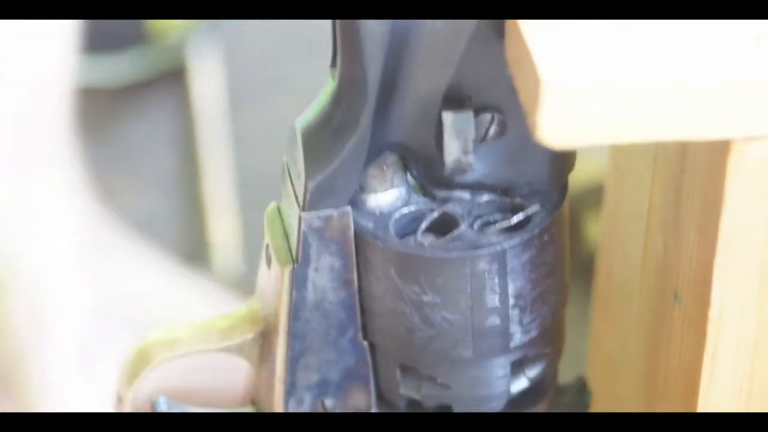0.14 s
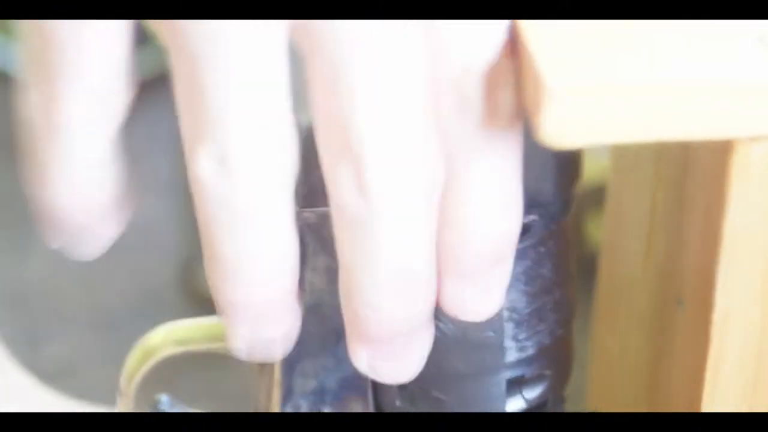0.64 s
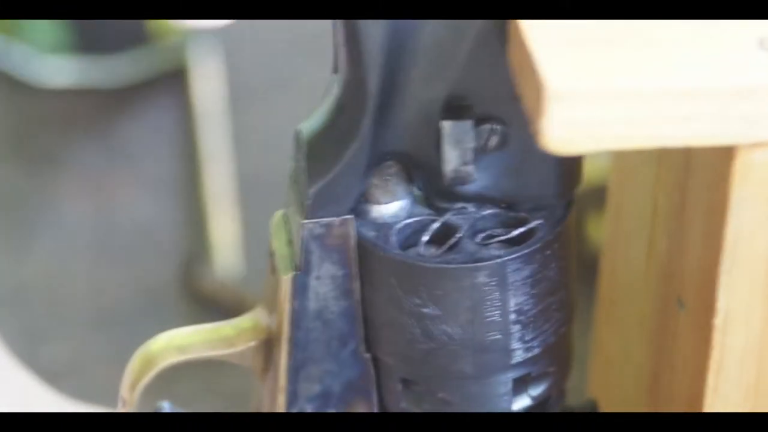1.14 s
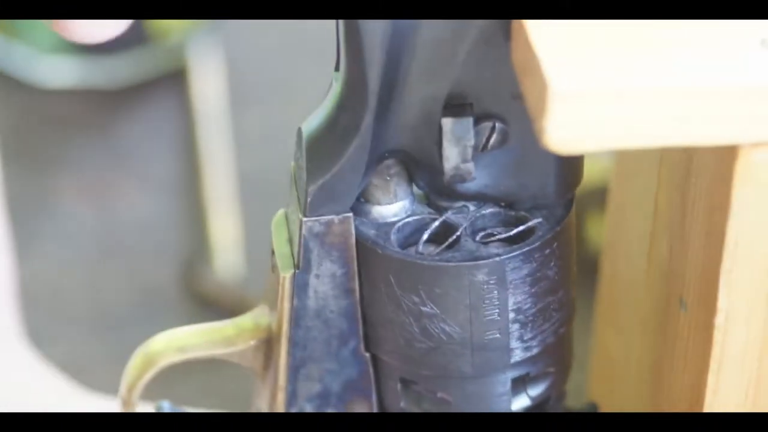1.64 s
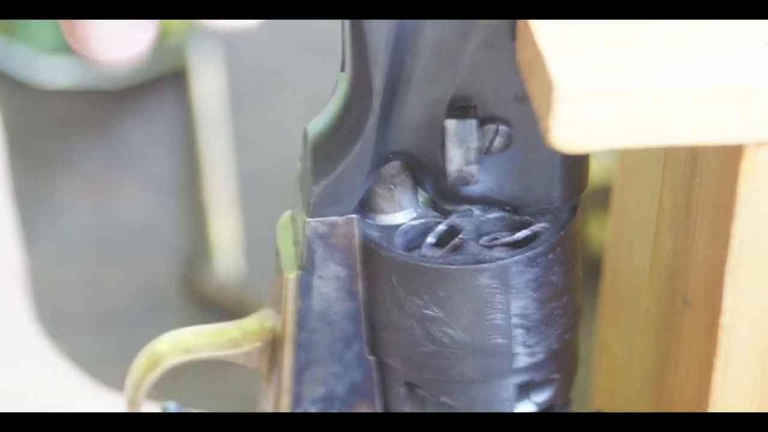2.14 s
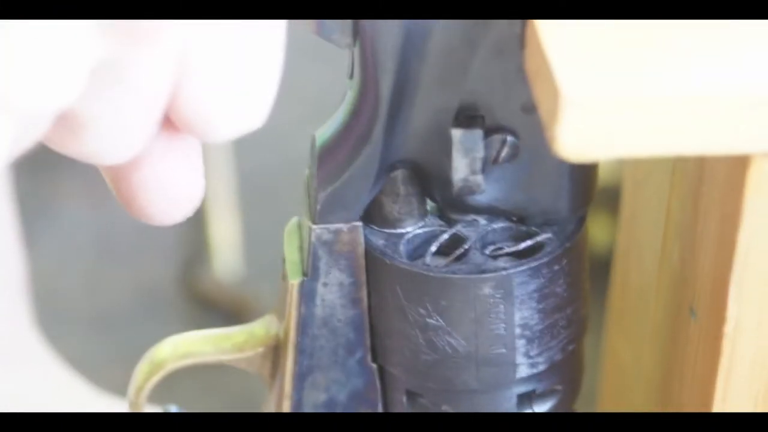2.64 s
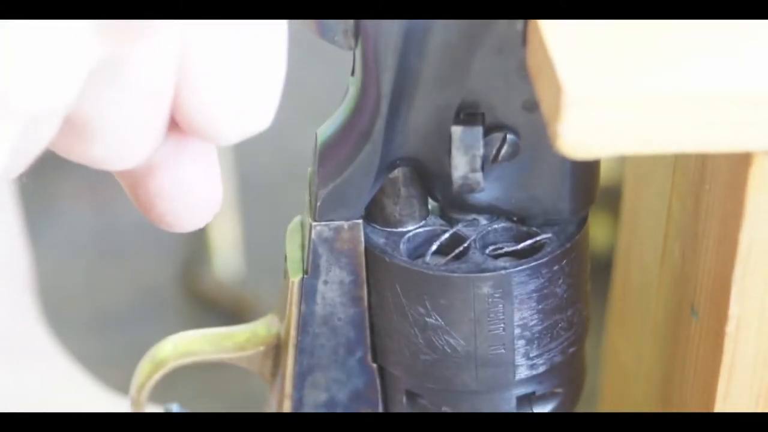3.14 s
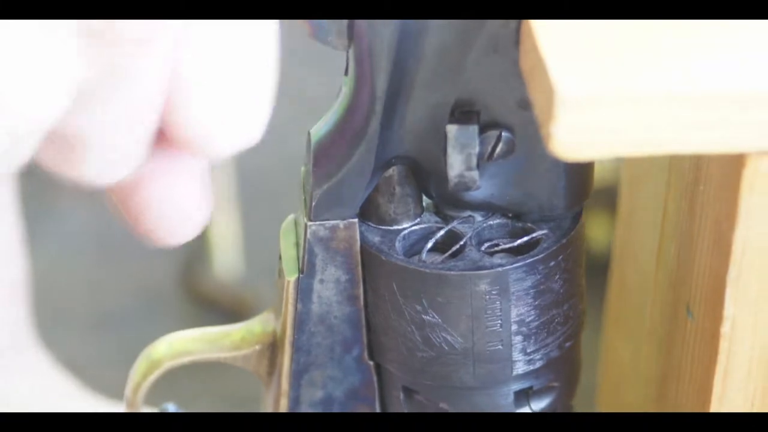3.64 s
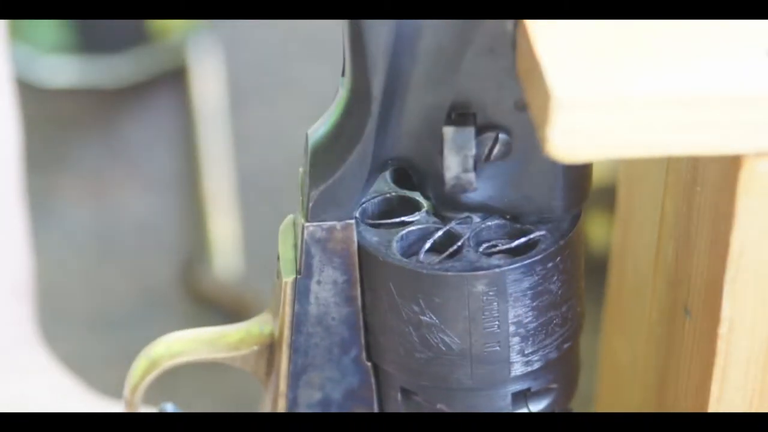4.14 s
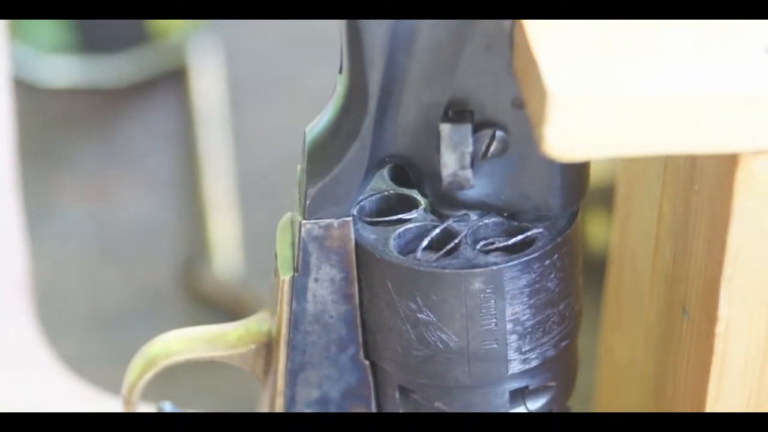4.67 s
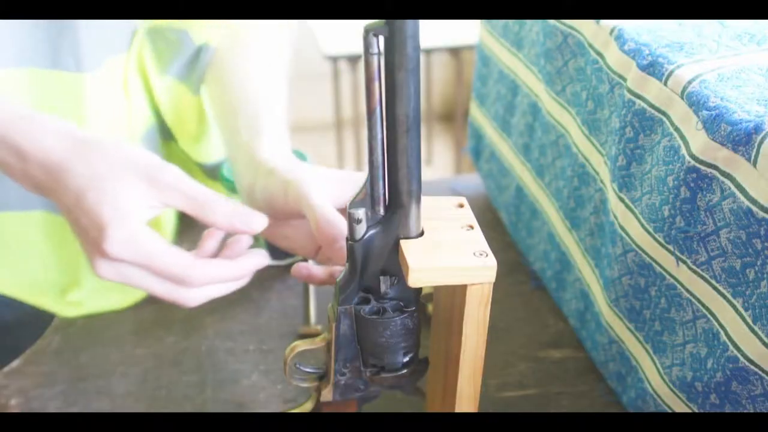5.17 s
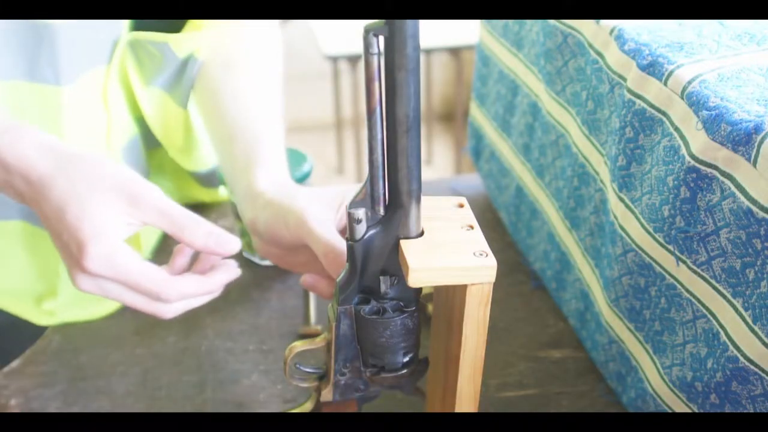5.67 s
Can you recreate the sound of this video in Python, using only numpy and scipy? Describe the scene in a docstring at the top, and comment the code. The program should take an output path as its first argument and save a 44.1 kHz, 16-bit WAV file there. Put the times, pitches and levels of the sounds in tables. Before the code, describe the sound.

Irregular shots with long tails, one loudest near one second, plus close metal-on-wood clacks, then an abrupt cut to quiet air.

```python
"""Gunshots at a covered shooting range, near and far, roll out in long echoes heard from a wooden bench.
Each shot is shaped noise in narrow bands; sharp ones add an N-shaped pressure wave and its floor bounce.
Close by, hands knock a revolver, its lever and small parts on the stand: struck modes, steel ticks, snaps
and rattle. Jolts of deep noise and a steady murmur of air lie beneath. A splice just past 5 s cuts the
echoes short; a quieter moment with a faint whine follows."""
import sys
import numpy as np
from scipy import signal
from scipy.io import wavfile

SR = 44100
rng = np.random.default_rng(int(sys.argv[2]) if len(sys.argv) > 2 else 0)


def put_to_file(sound):
    """Save the sound as 16-bit audio at rate SR, in the file named by the first command-line argument."""
    columns = np.atleast_2d(sound).T  # one column per channel
    safe = np.clip(columns, -1, 1)
    whole_steps = np.round(safe * 32767)
    wavfile.write(sys.argv[1], SR, whole_steps.astype(np.int16))


def amp(db):
    return 10 ** (np.asarray(db, float) / 20)


N = 255339

# gunshots: [t/s, mid level/dB, lack of bass/dB, loss in air near 5 kHz/dB, build-up/s, mid-range t60/s]
SHOTS = [(0.0, -45.5, -2.5, 13, 0.0029, 1.7), (.22, -34, -0.5, 20.5, 0.0079, 0.83),
         (.243, -38, 6.5, 6, 0.0062, .7), (1.0094, -19.5, 13, 4, .002, 1.24),
         (1.879, -48.5, 12.5, 14, 0.12, 1.8), (2.189, -44, 17.5, 30, 0.0044, 0.68),
         (2.216, -47.5, 1, 6.5, 0.028, 1.1), (2.626, -43.5, 17.5, 6.5, .0028, 0.86),
         (2.83, -48.5, 8.5, 5.5, .0033, 0.74), (3.359, -32.5, 12.5, 26.5, .0071, 1),
         (4.332, -53, 25.5, 7, .0017, 0.38), (4.346, -58, 16, 8, .004, 0.82),
         (4.754, -50.5, 12.5, 14, .0088, 0.74), (4.807, -47, 12.5, 17.5, .0062, 1.3),
         (5.73, -63.5, 10, 5, .02, 1.4)]
# dull booms of hidden shots: [t/s, mid level/dB, mid-range t60/s]
BOOMS = [(.385, -37, 0.28), (3.306, -44.5, 1.2)]
# bright slaps back from hard walls:
# [t/s, presence level/dB, treble against presence/dB, build-up/s, mid-range t60/s]
SLAPS = [(1.295, -26.5, -21, 0.014, 0.52), (1.587, -42, -20, .02, 0.65), (3.068, -55.5, -15, 0.0045, 0.74)]
# knocks on the stand: [t/s, mid level/dB, bass, upper mid, treble against mid/dB, tick f/Hz]
KNOCKS = [(.671, -44, -1.5, -24, -43, 3300), (.844, -46, -14, -33, -38, 3600),
          (2.195, -34, -47, -2, -42, 1806), (2.385, -20.5, 6, 6.5, -74, 2740),
          (2.391, -16.5, -7, -1.5, -35.5, 4590), (2.41, -23.5, -1, -11, -47, 3050),
          (2.481, -17, -9, -1, -34.5, 3020), (3.804, -44, -15, -13, -29, 2872),
          (3.818, -33, -5, 6, -44, 2870), (4.118, -31.5, -1.3, -3.5, -2.7, 5150),
          (4.166, -33.5, -0.5, -11, -2, 8240), (4.925, -39, -4, -8, -11, 4300)]
# small steel clicks: [t/s, level that sets the tick/dB, mid level of the rattle/dB, tick f/Hz]
CLICKS = [(1.589, -50, -60, 6500), (1.615, -48, -60, 6000), (2.197, -30, -52, 4800),
          (2.294, -36, -50, 6000), (2.334, -26, -42, 4320), (2.628, -28, -50, 4000),
          (2.836, -32, -56, 4100), (2.851, -28, -60, 2750), (3.073, -38, -60, 4300),
          (5.541, -26, -54, 3730)]
# click colour: [bass, upper mid, presence, treble against mid/dB]
CLICK_COLOUR_DB = (-18, 1.1, 0, -20)
# edges of bass, mid, upper mid, presence and treble: [f/Hz]
BAND_EDGES_HZ = [200, 600, 1400, 3400, 7000, 14000]
# colour shared by bangs and blows, bass cut of the microphone included: [f/Hz, level/dB]
ROLL_OFF = [(30, -31), (70, -34.5), (140, -16), (200, -12.5), (260, -2), (400, 2.5), (10000, 0.5),
            (14000, -21.5)]
# echoes die faster in the treble: [f/Hz, t60 against the mid range/ratio]
T60_SHARE = [(60, 0.23), (140, 0.96), (400, 0.79), (1500, 0.89), (4000, 0.69), (7000, 0.58), (10000, 0.4),
             (14000, 0.32)]
# left-right likeness of the diffuse sound: [f/Hz, correlation]
LIKENESS = [(40, -0.69), (130, 0.98), (350, .96), (700, 0.81), (1200, 0.61), (2000, 0.067), (2800, -0.05),
            (5000, -0.06), (12000, -0.056)]
# balance of the reflections: [f/Hz, left minus right/dB]
LEFT_LEAD = [(1000, 1.04), (3500, 0.5), (6000, 4), (9500, 4.5), (11500, -11.5), (14000, -26)]
# modes of the wooden stand: [f/Hz, relative level/dB, t60/s]
STAND = [(273, 1, 0.049), (372.7, -6, 0.14), (445.5, -7.5, 0.12), (470, -14.5, 0.069), (674, -10, 0.076),
         (734, -5.5, 0.19), (778, -2, 0.12), (901, -6, 0.12), (983, -11.5, 0.053), (1740, -12, 0.036),
         (2110, -18, 0.11), (2730, -18, 0.065), (3750, -12, 0.096)]
# colour of the murmur of air: [f/Hz, relative level per Hz/dB]
AIR = [(15, -43), (25, -3), (69, 0.5), (131, -40), (172, -14.5), (264, -9.5), (529, -1.5), (604, -20),
       (691, 0.5), (1760, -6), (2370, -4), (4260, -11.5), (7090, -21), (13100, -38.5), (15000, -56)]
# course of the murmur: [t/s, level/dB, extra level below 100 Hz/dB]
AIR_LEVEL = [(0, -47, -15), (1.5, -53, -12), (3.2, -48.5, -17), (4.6, -47.5, -11.5), (5.04, -51, -8),
             (5.06, -50.5, -10), (5.79, -51, -8.5)]
# shudders from the nearest blast and harder blows: [t/s, level/dB]
JOLTS = [(1.06, -62), (2.29, -61), (2.39, -58), (2.48, -60), (3.82, -65), (4.12, -68)]
# bench top reflecting into the microphone, mostly cancelling: [f/Hz, width/Hz, gain/dB]
BENCH_DIPS = [(597, 82, -9), (1377, 231, -16.5), (2341, 156, -26.5), (3427, 244, -10), (4200, 730, 1.5)]

STEP = 8   # samples per point of an energy curve
SPLICE_S, SPLICE_FADE_S = 5.046, 0.0073
UPPER_PER_LACK = 0.45   # the thinner a shot, the more it leans to the upper mid
TREBLE_DROP_DB, TREBLE_PER_LOSS = 8, 0.99   # treble lies below presence, further for distant shots
HOLD, HOLD_PER_LOSS = 1.123, 0.012   # above 1 the echoes last, then drop; more so from afar
BLAST_DB, BLAST_DB_PER_DOUBLING = 24.5, -21   # blast over mid at 2 ms build-up; slow build-ups hide it
SHOT_PAN_DB, SLAP_PAN_DB = -0.97, -2.5   # left minus right
BOOM_COLOUR_DB = (-1, -22, -35, -42)   # bass, upper mid, presence, treble against mid
BOOM_RISE_S = 0.005
SLAP_MID_DB = -17.5   # against presence
SLAP_BASS_DB, SLAP_UPPER_DB = -7.5, 5   # against mid
LATE_DB, LATE_T60_S = -17, 4.72   # weak, slow second tail from the far banks; t60 at share 1
AIR_WIDTH_HZ = 4800   # band over which the murmur spreads
PRESENCE_DB, PRESENCE_PER_UPPER, PRESENCE_PER_TREBLE = -6, 0.2, 0.16   # follows its two neighbours
TICK_DB, TICK_PER_UPPER = 11, 0.55   # a harder blow gives a louder steel tick
RATTLE_T60_S, WALL_T60_S = 0.06545, 0.066   # at 1 kHz and below, shorter above
WALL_DELAY_S, WALL_DB = 0.0095, -5   # a wall near the bench repeats every blow once
WALL_DULLING_DB = -3.5   # per octave above 1 kHz
ECHO_DB, ECHO_TILT_DB, ECHO_T60_S = -10.5, 0.43, 0.83   # tilt per octave above 1 kHz; t60 at share 1
SNAP_DB, SNAP_HZ = 15, 2500   # first contact against the blow's treble; lowest pitch
JOLT_T60_S, JOLT_LOW_HZ, JOLT_HIGH_HZ = 0.26, 25, 110
WHINE_HZ, WHINE_WIDTH_HZ, WHINE_DB = 7000, 250, -80.5


def at_hz(points, hz):
    """Read a table on a log-frequency axis."""
    table = np.array(points)
    return np.interp(np.log(hz), np.log(table[:, 0]), table[:, 1])


def band_db(mid_db, bass_db, upper_db, presence_db, treble_db, hz):
    """Level per Hz at one pitch from the levels of five wide bands."""
    edges = np.array(BAND_EDGES_HZ)
    levels = mid_db + np.array([bass_db, 0, upper_db, presence_db, treble_db])
    per_hz = levels - 10 * np.log10(np.diff(edges))
    centres = np.sqrt(edges[1:] * edges[:-1])
    return at_hz(np.c_[centres, per_hz], hz) + at_hz(ROLL_OFF, hz)


def band_pass(order, low_hz, high_hz, x):
    """Keep the sound between two pitches."""
    return signal.sosfilt(signal.butter(order, [low_hz, high_hz], "band", fs=SR, output="sos"), x)


def silent_energy():
    """An empty energy curve, one point per STEP samples."""
    return np.zeros(N // STEP + 1)


def add(power, start_s, level_db, rise_s, t60_s, hold=1):
    """Energy that builds up, then dies 60 dB in t60; the splice cuts whatever began before it."""
    first = max(round(start_s * SR / STEP), 0)
    t = np.arange(len(power) - first) * STEP / SR
    rise = 1 - np.exp(-t / max(rise_s, 1e-4))
    shape = rise * amp(-120 * (t / max(t60_s, .003)) ** hold)
    if start_s < SPLICE_S:
        shape = shape * np.clip((SPLICE_S - start_s - t) / SPLICE_FADE_S, 0, 1) ** 2
    power[first:] += amp(2 * level_db) * shape


def bang(s, mid_db, colour_db, rise_s, t60_s, hold, pan_db):
    """One row (t, five band levels, build-up, t60, hold, blast, pan); sharp build-ups blast louder."""
    blast_db = mid_db + BLAST_DB + BLAST_DB_PER_DOUBLING * np.log2(rise_s / 2e-3)
    return (s, mid_db, *colour_db, rise_s, t60_s, hold, blast_db, pan_db)


def bangs():
    """Shots, booms and slaps with their colours worked out: distance dulls, lack of bass thins."""
    rows = []
    for s, mid_db, lack_db, loss_db, rise_s, t60_s in SHOTS:
        upper_db = UPPER_PER_LACK * lack_db
        presence_db = upper_db - loss_db
        treble_db = presence_db - TREBLE_PER_LOSS * loss_db - TREBLE_DROP_DB
        colour_db = (-lack_db, upper_db, presence_db, treble_db)
        hold = HOLD + HOLD_PER_LOSS * loss_db
        rows.append(bang(s, mid_db, colour_db, rise_s, t60_s, hold, SHOT_PAN_DB))
    for s, mid_db, t60_s in BOOMS:
        rows.append(bang(s, mid_db, BOOM_COLOUR_DB, BOOM_RISE_S, t60_s, HOLD, SHOT_PAN_DB))
    for s, presence_db, treble_db, rise_s, t60_s in SLAPS:
        colour_db = (SLAP_BASS_DB, SLAP_UPPER_DB, -SLAP_MID_DB, treble_db - SLAP_MID_DB)
        rows.append(bang(s, presence_db + SLAP_MID_DB, colour_db, rise_s, t60_s, HOLD, SLAP_PAN_DB))
    return rows


def bang_echoes(hz):
    """Left and right energy of the bangs at one pitch: a main tail and a slow answer from the far banks."""
    left, right = silent_energy(), silent_energy()
    share = at_hz(T60_SHARE, hz)
    treble_hold = 0.1 * max(np.log2(hz / 3000), 0)   # the treble holds longest
    for s, *colour, rise_s, t60_s, hold, blast_db, pan_db in bangs():
        tail = silent_energy()
        level_db = band_db(*colour, hz)
        add(tail, s, level_db, rise_s, t60_s * share, hold + treble_hold)
        add(tail, s, level_db + LATE_DB, .1, LATE_T60_S * share ** 2)
        left += tail * amp(pan_db)   # amp() on energy gives half the dB to each side
        right += tail * amp(-pan_db)
    return left, right


def air_murmur(hz):
    """Energy of the steady murmur of air at one pitch, with its own rumble below 100 Hz."""
    s, air_db, rumble_db = np.transpose(AIR_LEVEL)
    t = np.arange(N // STEP + 1) * STEP / SR
    level_db = np.interp(t, s, air_db + rumble_db * (hz < 100))
    return amp(2 * (level_db + at_hz(AIR, hz) - 10 * np.log10(AIR_WIDTH_HZ)))


def echo_swarm(spread_db, lump_hz):
    """Four noises whose strength jumps together, as single reflections stand out of the crowd."""
    r = np.exp(-2 * np.pi * lump_hz / SR)
    lumps = signal.lfilter([1], [1, -2 * r, r * r], rng.standard_normal(N))
    swarm = rng.standard_normal((2, 2, N)) * amp(spread_db * lumps / lumps.std())
    return swarm / swarm.std()


def reverberation():
    """Narrow bands of noise carry echoes, rattle and air, each with its own likeness and balance."""
    out = np.zeros((2, N))
    swarm = echo_swarm(spread_db=2.2, lump_hz=700)
    edges = 28 * 2 ** np.arange(0, 9.3, .4)
    for k, (low, high) in enumerate(zip(edges, edges[1:])):
        hz = np.sqrt(low * high)
        mid, side = swarm[k % 2] * np.sqrt(SR / 2)   # unit power per Hz
        left, right = bang_echoes(hz)
        close, blow_echo = blow_rattle(hz)
        both = blow_echo + air_murmur(hz)
        energy = np.array([left + both, right + both, close])
        left, right, close = np.sqrt(np.repeat(energy, STEP, axis=1)[:, :N])
        alike = np.clip(at_hz(LIKENESS, hz), -1, 1)
        lead = amp(at_hz(LEFT_LEAD, hz) / 2)
        mid_part, side_part = np.sqrt((1 + alike) / 2) * mid, np.sqrt((1 - alike) / 2) * side
        pair = [lead * (left * (mid_part + side_part) + close * mid),
                (right * (mid_part - side_part) + close * mid) / lead]
        out += band_pass(3, low, high, pair)
    return out


def muzzle_blasts(length_s, bounce_s, bounce_db):
    """Each direct blast is an N-shaped pressure wave and its floor bounce, thinned of bass."""
    rows, clicks = bangs(), np.zeros(N)
    clicks[[round(row[0] * SR) for row in rows]] = amp(np.array(rows)[:, 9])
    n_wave = np.linspace(1, -1, max(round(length_s * SR), 4))
    wave = signal.lfilter(n_wave, [1], clicks)
    wave += amp(bounce_db) * np.roll(wave, round(bounce_s * SR))
    return band_pass(2, 1400, 6000, wave + 1e-18)


def blows():
    """Knocks and clicks as rows (t, tick level, five band levels, tick f)."""
    rows = []
    for s, mid_db, bass_db, upper_db, treble_db, hz in KNOCKS:
        tick_db = mid_db + TICK_DB + TICK_PER_UPPER * upper_db
        presence_db = PRESENCE_DB + PRESENCE_PER_UPPER * upper_db + PRESENCE_PER_TREBLE * treble_db
        rows.append((s, tick_db, mid_db, bass_db, upper_db, presence_db, treble_db, hz))
    for s, tick_db, rattle_db, hz in CLICKS:
        rows.append((s, tick_db, rattle_db, *CLICK_COLOUR_DB, hz))
    return rows


def blow_rattle(hz):
    """Energy of the blows at one pitch: close rattle with its wall repeat, and the diffuse echo."""
    close, echo = silent_energy(), silent_energy()
    share = at_hz(T60_SHARE, hz)
    octaves = max(np.log2(hz / 1000), 0)
    thin_db = -9 * max(np.log2(260 / hz), 0)   # small parts radiate little bass
    for s, tick_db, *colour, tick_hz in blows():
        level_db = band_db(*colour, hz) + thin_db
        crack_db = level_db - 3.5 + 4.05 * octaves   # the treble of a blow is short and sharp
        add(close, s, crack_db, .0003, RATTLE_T60_S * 2 ** (-1.05 * octaves))
        wall_db = crack_db + WALL_DB + WALL_DULLING_DB * octaves
        add(close, s + WALL_DELAY_S, wall_db, .001, WALL_T60_S * 2 ** (-.8 * octaves))
        add(echo, s, level_db + ECHO_DB + ECHO_TILT_DB * octaves, .012, ECHO_T60_S * share ** 1.22)
    return close, echo


def ring(clicks, hz, t60):
    """A unit click sets a decaying sine of height 1 ringing."""
    r, w = amp(-60 / (t60 * SR)), 2 * np.pi * hz / SR
    return signal.lfilter([0, np.sin(w)], [1, -2 * r * np.cos(w), r * r], clicks + 1e-18)


def wooden_stand(ring_db):
    """Each blow strikes every mode of the stand, harder in the bands where the blow is strong."""
    rows, out = blows(), np.zeros(N)
    at = [round(row[0] * SR) for row in rows]
    luck_db = rng.normal(0, 2, (len(at), len(STAND)))
    for k, (hz, level_db, t60) in enumerate(STAND):
        strike_db = np.array([band_db(*row[2:7], hz) for row in rows])
        clicks = np.zeros(N)
        clicks[at] = amp(strike_db + level_db + ring_db + luck_db[:, k])
        out += ring(clicks, hz, t60) * (-1) ** k
    # a soft contact and a microphone deaf to bass
    return band_pass(4, 230, 5000, out)


def metal_ticks(trim_db, t60_s):
    """Steel meets steel at each blow: a brief ring at the pitch of the part touched."""
    out, t = np.zeros(N), np.arange(2000) / SR
    for s, tick_db, *colour, hz in blows():
        at = round(s * SR)
        out[at:at + len(t)] += amp(tick_db + trim_db - 60 * t / t60_s) * np.sin(2 * np.pi * hz * t)
    return band_pass(2, 1200, 10000, out + 1e-18)


def snaps():
    """The first touch of a blow is a single sharp click, as strong as the blow's treble."""
    clicks = np.zeros(N)
    for s, tick_db, mid_db, bass_db, upper_db, presence_db, treble_db, hz in blows():
        clicks[round(s * SR)] = amp(mid_db + treble_db + SNAP_DB)
    return signal.sosfilt(signal.butter(2, SNAP_HZ, "high", fs=SR, output="sos"), clicks + 1e-18)


def jolts():
    """Bench and microphone shake: short shudders of deep noise."""
    power = silent_energy()
    for s, level_db in JOLTS:
        add(power, s, level_db, .01, JOLT_T60_S)
    deep = band_pass(2, JOLT_LOW_HZ, JOLT_HIGH_HZ, rng.standard_normal(N))
    return np.sqrt(np.repeat(power, STEP)[:N]) * deep / deep.std()


def whine():
    """A faint, narrow band of noise that starts with the splice."""
    low_hz, high_hz = WHINE_HZ - WHINE_WIDTH_HZ / 2, WHINE_HZ + WHINE_WIDTH_HZ / 2
    hiss = band_pass(2, low_hz, high_hz, rng.standard_normal((2, N)))
    return amp(WHINE_DB) * hiss / hiss.std() * (np.arange(N) > SPLICE_S * SR)


def scene():
    """Reflections and murmur, direct blasts, the struck bench, jolts and the whine."""
    blasts = muzzle_blasts(length_s=.00045, bounce_s=0.00144, bounce_db=-2.5)
    bench = wooden_stand(ring_db=26.5) + metal_ticks(trim_db=-14.5, t60_s=0.032) + snaps()
    return reverberation() + blasts + bench + jolts() + whine()


def low_pass(x):
    """Removes everything above the highest recorded frequency."""
    return signal.sosfilt(signal.butter(12, 15520, fs=SR, output="sos"), x)


def record(dry):
    """The bench top's reflection colours the sound, the top is cut and peaks are rounded."""
    for hz, width_hz, gain_db in BENCH_DIPS:
        w, a = 2 * np.pi * hz / SR, amp(gain_db / 2)
        k = np.pi * width_hz / SR
        zeros = [1 + k * a, -2 * np.cos(w), 1 - k * a]
        poles = [1 + k / a, -2 * np.cos(w), 1 - k / a]
        dry = signal.lfilter(zeros, poles, dry)
    dry = signal.sosfilt(signal.cheby2(10, 50, 15000, fs=SR, output="sos"), dry)
    ceiling = 1.6   # where the rounded peaks level off
    mix = ceiling * np.tanh(amp(3.0) * dry / ceiling)
    return low_pass(mix)


dry = scene()
out = record(dry)
put_to_file(out)
```